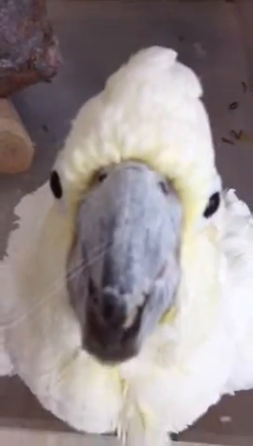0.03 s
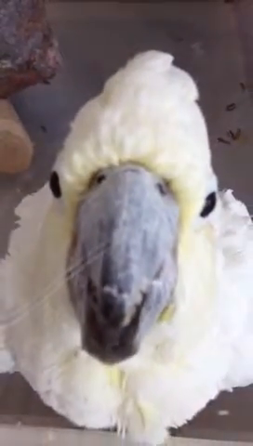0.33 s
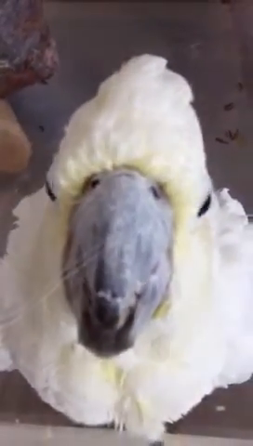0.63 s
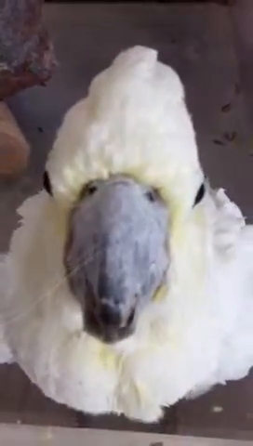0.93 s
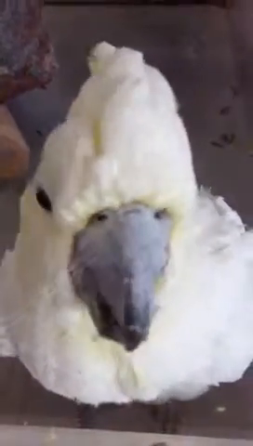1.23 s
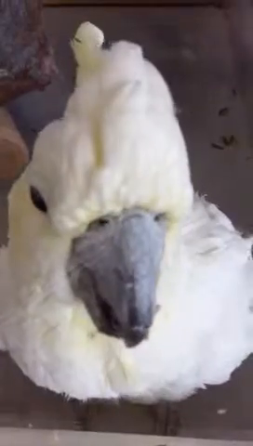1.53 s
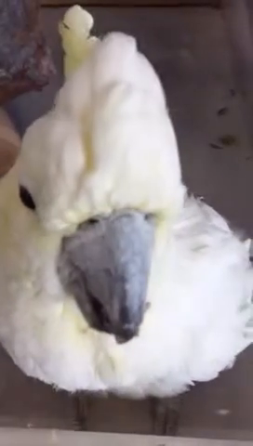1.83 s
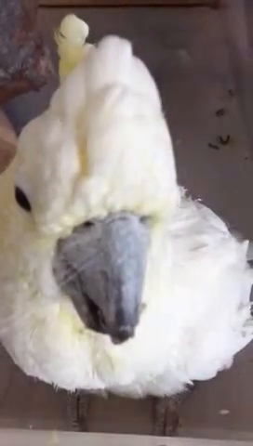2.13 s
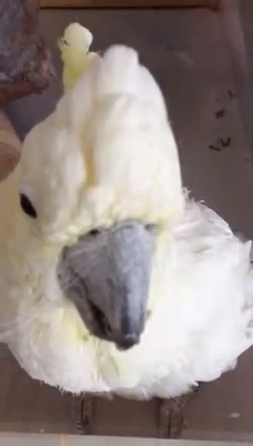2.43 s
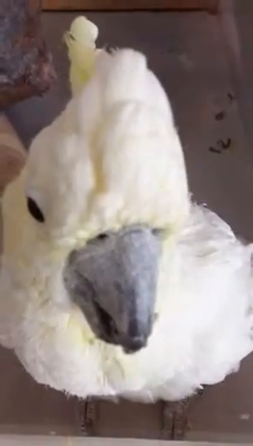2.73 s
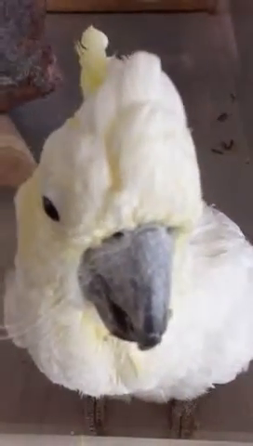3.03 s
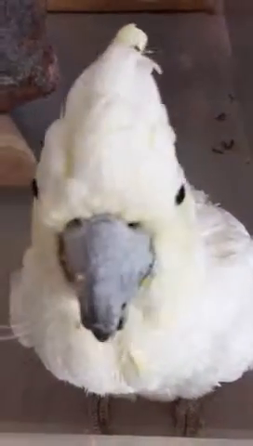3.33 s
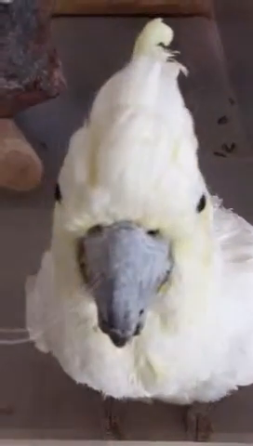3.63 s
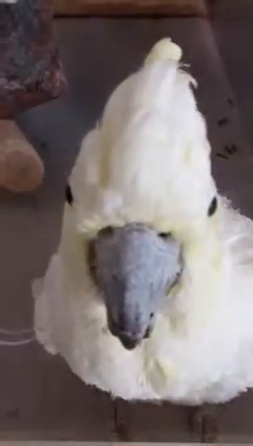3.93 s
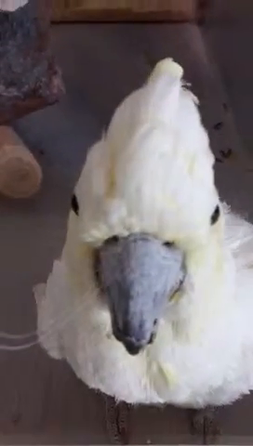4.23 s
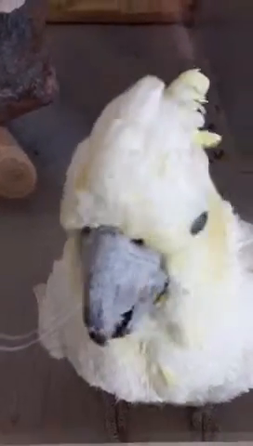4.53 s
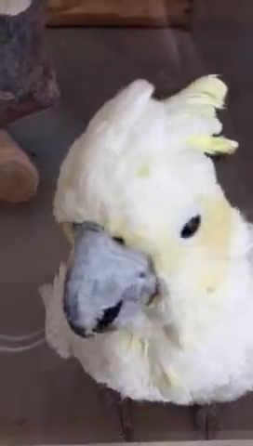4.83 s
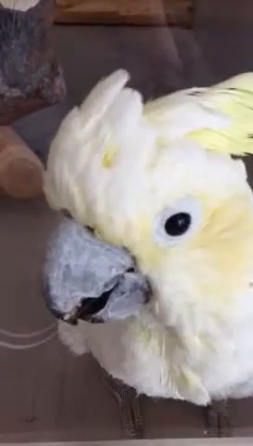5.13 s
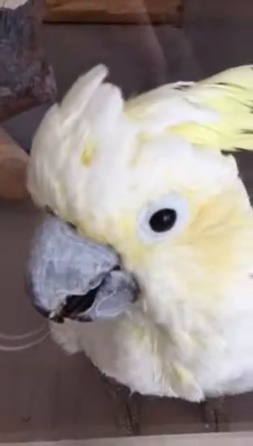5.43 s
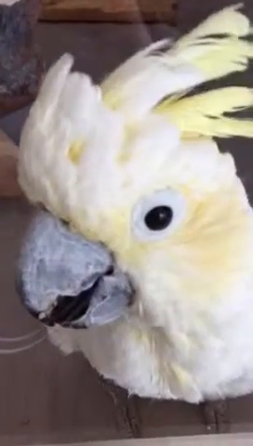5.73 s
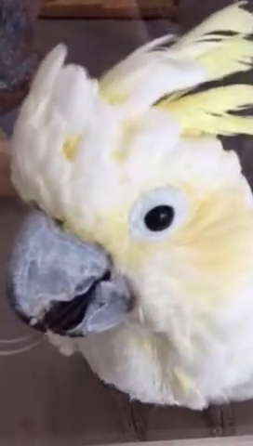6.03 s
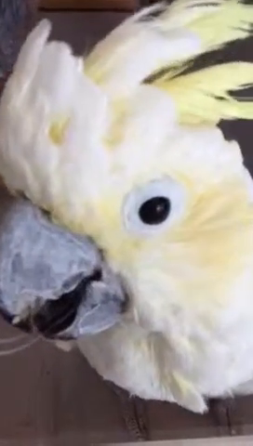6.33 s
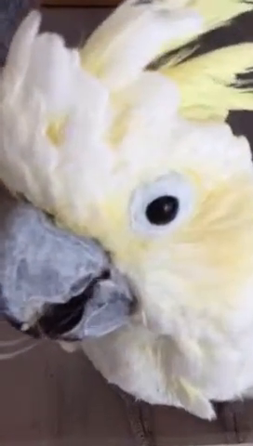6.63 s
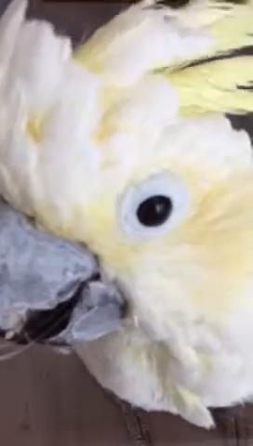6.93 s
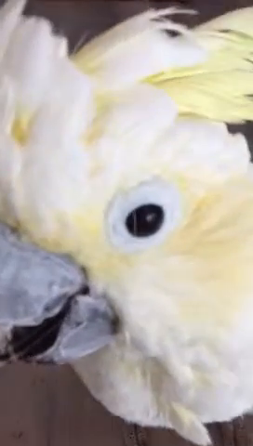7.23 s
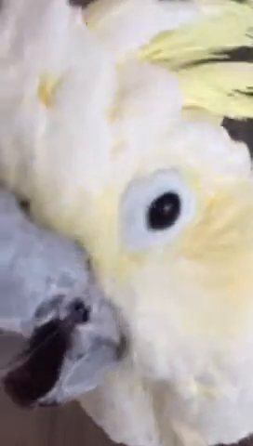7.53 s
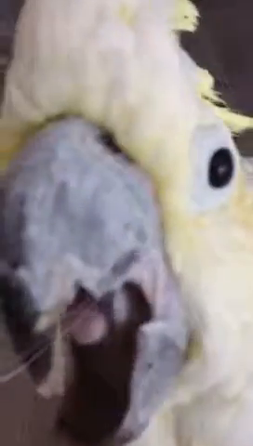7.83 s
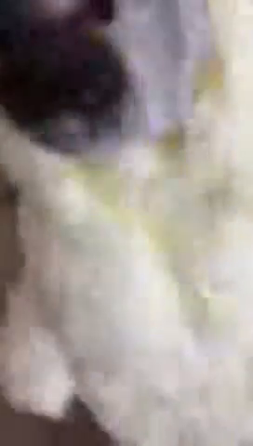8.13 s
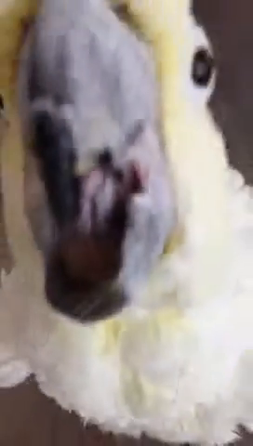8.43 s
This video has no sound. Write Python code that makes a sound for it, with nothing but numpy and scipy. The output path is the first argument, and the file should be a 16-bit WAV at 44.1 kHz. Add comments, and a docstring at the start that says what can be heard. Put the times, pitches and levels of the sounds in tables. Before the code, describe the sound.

A quiet, steady low ventilation rumble fills a hard-walled enclosure throughout. Soft low bumps come at about 0.2 and 0.9 seconds as a cockatoo shifts behind a pane. From 1 to 1.5 seconds the bird gives a breathy hiss that swells in quick pushes and leaves a short echo. Another soft bump comes at 3 seconds, and very faint, thin wheezes flicker from 3 to 4 seconds and again from 5.5 to 6. At about 7.1 seconds a soft thump starts a second, raspier hiss, which lasts until nearly 7.9. Just after 8.1 seconds the beak strikes the pane twice in very quick succession: sharp, close knocks with a brief rattling rebound and a low thud from the frame, by far the loudest sounds. A last faint wheeze and a soft bump follow by 8.5 seconds.

```python
"""Ventilation rumbles steadily in a hard-walled enclosure, where a cockatoo shifts behind a pane.
At 1 s it hisses: turbulent air excites the resonances of its throat and beak, which move as the beak
opens. From 3 to 6 s it wheezes softly through a narrow gap, and at 7 s it hisses again. Just after
8 s its beak strikes the pane twice, rebounding each time and exciting the modes of pane and frame.
A last wheeze and a soft bump follow. Both channels carry the same signal."""
import sys
import numpy as np
from scipy import signal
from scipy.fft import rfft, irfft
from scipy.io import wavfile
from scipy.ndimage import map_coordinates

SR = 44100
rng = np.random.default_rng(int(sys.argv[2]) if len(sys.argv) > 2 else 0)


def dump_mix(stems):
    """Bounce the given channels to the path in sys.argv[1] as a 16-bit WAV at rate SR."""
    frames = np.atleast_2d(stems).T  # one column per channel
    limited = np.clip(frames, -1, 1)  # hard clip at full scale
    pcm = np.round(limited * 32767).astype(np.int16)
    wavfile.write(sys.argv[1], SR, pcm)


N = 378378
TIME, FREQ = np.arange(N) / SR, np.maximum(np.fft.rfftfreq(N, 1 / SR), 1)

# spectrum of the ventilation and a faint steady hiss: (frequency [Hz], relative level [dB])
VENT_SPECTRUM = [(40, -113), (70, -104), (104, -88), (125, -75), (175, -72.5), (230, -78.5), (310, -80),
                 (450, -85), (680, -89), (1150, -97), (1600, -101), (2300, -105), (5000, -107),
                 (15000, -110.5)]
# low resonances of the room: (frequency [Hz], width [Hz], relative level [dB])
ROOM_MODES = [(90, 17, -19), (120.8, 9.3, -5.5), (163, 28.4, -5), (266.4, 29, -10), (366.2, 11, -7.5),
              (733, 11, -17.5), (873, 16, -18.5)]
# modes of the pane and of its frame: (frequency [Hz], level [dB], 60 dB decay time [s])
PANE_MODES = [(215, -8, .16), (355, -10, .18), (415, -13, .12), (498, -6, .14), (590, -4, .13),
              (648, -3, .15), (696, -5, .15), (762, -7, .14), (863, -4, .16), (934, -6, .14),
              (991, -8, .09), (1205, -7, .12), (1372, -3.5, .19), (1418, -11, .08), (1547, -12, .1),
              (1700, -11, .08), (1814, -11, .08), (1900, -11, .08), (2320, -15, .07), (2640, -10, .07)]
FRAME_MODES = [(140.3, -6.5, 0.18), (175.3, 2.5, 0.15)]
# dense, short-lived bending waves of the pane: (frequency [Hz], relative level [dB])
BENDING_SPECTRUM = [(80, -22), (200, 16.5), (400, 9), (650, 5), (1100, 8), (1600, 10), (2200, 6), (2800, 6),
                    (3300, -3), (7000, -33), (14000, -40)]
# soft low thumps of the frame, as the bird shifts or just after the first beak strike:
# (time [s], level [dB])
BUMPS = [(0.206, -41.5), (0.915, -44), (3.045, -40), (7.107, -38.5), (8.1519, -29), (8.471, -40.5)]
# spray of air past the edge of the beak: (frequency [Hz], width [Hz], relative level [dB])
SPRAY_BANDS = [(5530, 980, -3), (4400, 1800, -7)]
# weak breaths: (start [s], hold [s], level [dB], whistle [Hz], throat [Hz],
# throat re whistle [dB], spray re whistle [dB])
WHEEZES = [(3.09, .06, -82, 5880, 2900, -3, -5), (3.278, .04, -82, 5280, 2680, 5, 4),
           (3.358, .05, -78, 4530, 2660, -1, -2), (3.507, 0.108, -84, 4750, 2780, 4, 7),
           (3.63, 0.044, -79.5, 5070, 2800, -10, -1), (3.75, .04, -77, 5040, 3100, -6, -3),
           (3.955, 0.022, -79, 4620, 3080, 5, 6), (4.05, 0.068, -81, 5300, 2950, 0, 3),
           (5.457, .07, -78.5, 5820, 2940, -2, -12), (5.62, 0.027, -81, 5270, 2900, -6, -8),
           (5.69, 0.045, -73.5, 4180, 2900, -11, -1), (5.787, .02, -78, 4530, 2950, -5, -6),
           (5.897, 0.046, -81.5, 5700, 2950, 1, 6), (8.27, 0.11, -78.5, 6230, 2820, -1, 2)]
# resonances of throat and beak in each posture: (frequency [Hz], width [Hz], relative level [dB])
SLIT = [(3340, 580, -5), (4170, 600, -1), (4700, 500, -9), (6200, 2100, -13)]
PARTED = [(2310, 1500, -20), (3230, 150, 5), (3520, 260, -14), (4270, 440, -6), (4860, 290, -1.5),
          (6520, 350, -5), (7600, 5000, -24.5)]
SPREAD = [(2530, 260, -12), (3820, 270, 2), (4250, 550, -5), (4740, 310, 1), (5200, 390, -5),
          (7400, 500, -16), (9600, 960, -20)]
THRUST = [(2480, 580, -18), (3230, 120, -14), (3730, 280, 3.5), (4390, 420, 3), (5050, 240, -10),
          (7300, 440, -15), (8700, 1200, -26.5), (11250, 800, -24.5)]
RASPING = [(1470, 1100, -13.5), (2400, 280, 0), (2820, 320, 5.5), (3400, 700, -5.5), (4100, 450, 0),
           (4780, 280, -1), (5700, 780, -5), (7100, 3100, -14)]
OPENING = [(1470, 1200, -12), (2420, 220, -3), (2920, 400, 0), (4080, 610, 6.5), (4720, 310, 2.5),
           (5340, 1300, -1.5), (6900, 3100, -15)]
TONGUE_UP = [(2690, 880, -11), (4440, 520, -4), (4930, 380, -1), (5180, 130, 3.5), (5350, 330, -14),
             (8550, 580, -18), (10100, 990, -18), (12600, 1800, -27)]
GAPING = [(1370, 780, -17), (2350, 110, 1), (2800, 480, 0), (3350, 550, -4.5), (4020, 210, 0.5),
          (4460, 650, -1), (5330, 470, 0.5), (6900, 1200, -17), (9150, 4800, -25)]
# pushes of air, four to a hiss: (start [s], hold [s], level [dB], glide [octaves/s], posture)
HISS_PUSHES = [(1.055, 0.021, -56.5, 0.2, SLIT), (1.106, 0.04, -52, 0.04, PARTED),
               (1.239, 0.018, -48.5, 0.11, SPREAD), (1.309, 0.013, -44.5, -0.04, THRUST),
               (7.121, 0.026, -55.5, 0.195, RASPING), (7.225, 0.022, -54, 0.195, OPENING),
               (7.404, .05, -52.5, 0.11, TONGUE_UP), (7.578, 0.089, -51.5, -0.087, GAPING)]
# blows of the beak: (time [s], level [dB], contact bandwidth [Hz], horn tick [dB], frame thump [dB],
# first rebound re blow [dB], tick of first rebound [dB])
BEAK_STRIKES = [(8.13, -22.5, 2230, -36, -29.5, -27, -61), (8.1896, -20, 1230, -48, -27.5, -12.5, -43)]


def undb(db):
    """Amplitude ratio of a level in decibels."""
    return 10 ** (np.asarray(db) / 20)


def unit(x):
    """Normalisation to rms 1."""
    return x / np.sqrt(np.mean(x ** 2))


def noise(gain):
    """Spectral shaping: white noise weighted by a gain at each frequency, at rms 1."""
    return unit(irfft(rfft(rng.standard_normal(N)) * gain, N))


def colour(points):
    """Spectral envelope: levels interpolated over log frequency, returned as gain."""
    hz, db = np.transpose(points)
    return undb(np.interp(np.log(FREQ), np.log(hz), db))


def resonances(modes):
    """Frequency response of steep-sided resonances that add in power."""
    gains = (undb(db) / (1 + ((FREQ / hz - hz / FREQ) * hz / width) ** 2) for hz, width, db in modes)
    return np.sqrt(sum(gain ** 2 for gain in gains))


def fluctuation(rate_hz):
    """Low-passed noise: a smooth random variation of rms 1."""
    return noise(1 / (1 + (FREQ / rate_hz) ** 4))


def decay(t, t60):
    """Exponential damping by 60 dB in t60 seconds."""
    return np.exp(-np.log(1000) * t / t60)


def ring(modes, t):
    """Superposition of damped modes after a blow; random signs stand for the place struck."""
    signs = rng.choice([-1, 1], len(modes))
    return sum(sign * undb(db) * np.sin(2 * np.pi * hz * t) * decay(t, t60)
               for sign, (hz, db, t60) in zip(signs, modes))


def cut(x, order, hz, kind):
    """Maximally flat low-pass or high-pass filtering."""
    return signal.sosfilt(signal.butter(order, hz, kind, fs=SR, output="sos"), x)


def ventilation(level_db=-52.5, modes_db=-6):
    """Forced vibration: a steady rush of air drives the low resonances of the room."""
    boom = undb(modes_db) * noise(resonances(ROOM_MODES))
    rush = noise(colour(VENT_SPECTRUM))
    return undb(level_db) * unit(rush + boom)


def enclosure(x, t60=1.25, treble_t60=0.43, crossover_hz=5600, build_s=0.0075):
    """Reverberation: hard walls return a diffuse tail of unit energy whose treble dies sooner."""
    treble = 1 / (1 + (crossover_hz / FREQ) ** 4)
    white = rfft(rng.standard_normal(N))
    low_tail = irfft(white * (1 - treble), N) * decay(TIME, t60)
    high_tail = irfft(white * treble, N) * decay(TIME, treble_t60)
    tail = (low_tail + high_tail) * (1 - np.exp(-TIME / build_s))
    return signal.fftconvolve(x, tail / np.linalg.norm(tail))[:N]


def bumps(rise_s=0.0054):
    """A slowly applied force excites only the lowest modes, those of the frame."""
    out = np.zeros(N)
    for time, db in BUMPS:
        start = int(time * SR)
        age = TIME[:min(SR // 2, N - start)]
        out[start:start + len(age)] += undb(db) * ring(FRAME_MODES, age) * (1 - np.exp(-age / rise_s))
    return out


def push(air, start, hold, octaves_per_s, attack_s, fall_db_per_s):
    """Variable resonator: a breath swells, holds and fades while the moving beak retunes it."""
    out, first = np.zeros(N), int(start * SR)
    age = TIME[:min(SR // 2, N - first)]
    swell = np.clip(age / attack_s, 0, 1)
    fall = undb(-fall_db_per_s * np.maximum(age - attack_s - hold, 0))
    # reading the noise at a changing speed slides all its resonances together
    speed = 2 ** (octaves_per_s * (age - attack_s - hold / 2))
    gliding = map_coordinates(air[:SR], [np.cumsum(speed)], mode="mirror")
    out[first:first + len(age)] = swell * fall * gliding
    return out


def wheezes(eddy_db=3.0, break_db=2, whistle_width_hz=110, throat_width_hz=380):
    """Flow through a narrow gap: a thin, breaking whistle, a throat resonance and a spray of air."""
    out, spray = np.zeros(N), noise(resonances(SPRAY_BANDS))
    breaks = undb(break_db * fluctuation(rate_hz=24))
    for start, hold, db, whistle_hz, throat_hz, throat_db, spray_db in WHEEZES:
        whistle = breaks * noise(resonances([(whistle_hz, whistle_width_hz, 0)]))
        throat = noise(resonances([(throat_hz, throat_width_hz, 0)]))
        air = (whistle + undb(throat_db) * throat + undb(spray_db) * spray)[int(start * SR):]
        out += undb(db) * push(air, start, hold, octaves_per_s=0.097, attack_s=0.0704, fall_db_per_s=170)
    return out * undb(eddy_db * fluctuation(rate_hz=25))


def hisses(eddy_db=1.37):
    """Source and filter: overlapping pushes of turbulent air excite throat and beak in each posture."""
    out = np.zeros(N)
    for start, hold, db, glide, posture in HISS_PUSHES:
        air = noise(resonances(posture))
        out += undb(db) * push(air, start, hold, glide, attack_s=0.11, fall_db_per_s=132)
    return out * undb(eddy_db * fluctuation(rate_hz=45))


def contacts(rebounds=3, first_gap_s=0.022, gap_ratio=0.88, loss_db=3, tick_loss_db=10):
    """Inelastic collision: after each strike the beak rebounds, every time sooner and weaker."""
    for time, db, contact_hz, tick_db, thump_db, rebound_db, rebound_tick_db in BEAK_STRIKES:
        yield time, db, contact_hz, tick_db, thump_db
        for k in range(rebounds):
            time += first_gap_s * gap_ratio ** k
            weaker_db = rebound_db - k * loss_db
            yield time, db + weaker_db, contact_hz, rebound_tick_db - k * tick_loss_db, thump_db + weaker_db


def knocks(ring_db=-13, crack_db=-9, shove_db=1.5, crack_s=0.013, tick_s=0.00098, thump_rise_s=0.0027):
    """Impact excitation: each contact shoves the pane, rings it and its frame, and ticks the beak."""
    out = np.zeros(N)
    bending = noise(colour(BENDING_SPECTRUM))
    horn = noise(resonances([(4400, 3300, 10), (7400, 1800, -15)]))
    for time, db, contact_hz, tick_db, thump_db in contacts():
        start = int(time * SR)
        age = TIME[:min(SR // 2, N - start)]
        span = slice(start, start + len(age))
        crack = undb(crack_db) * bending[span] * np.exp(-age / crack_s)
        ringing = undb(ring_db) * ring(PANE_MODES, age)
        # a softer contact lasts longer and so leaves out the treble
        body = cut(ringing + crack, 2, contact_hz, "low")
        # the shove is one swing of pressure, shorter and stronger for a sharp contact
        swing = np.pi * np.minimum(0.6 * contact_hz * age, 1)
        shove = undb(shove_db) * np.sqrt(contact_hz / 1000) * np.sin(2 * swing) * np.sin(swing)
        pane = cut(shove + body, 2, 145, "high")  # too small to radiate bass
        tick = horn[span] * np.exp(-age / tick_s)
        thump = ring(FRAME_MODES, age) * (1 - np.exp(-age / thump_rise_s))
        out[span] += undb(db) * pane + undb(tick_db) * tick + undb(thump_db) * thump
    return out


def scene(hiss_room_db=-2.2, wheeze_room_db=-0.5, pane_room_db=-11):
    """Direct and reverberant fields add: the breaths fill the enclosure, the knocks sound close."""
    hiss, wheeze, knock = hisses(), wheezes(), knocks()
    # the pane sheds mostly its middle modes into the enclosure
    shed = cut(knock, 1, 800, "high")
    shed = cut(shed, 4, 2100, "low")
    into_room = undb(hiss_room_db) * hiss + undb(wheeze_room_db) * wheeze + undb(pane_room_db) * shed
    reverberation = enclosure(into_room)
    mono = hiss + wheeze + knock + bumps() + reverberation + ventilation()
    return np.array([mono, mono])


def record(dry):
    """Band limiting removes the deepest bass and the highest treble."""
    top_cut = signal.ellip(10, 0.2, 70, 15350, fs=SR, output="sos")
    return signal.sosfilt(top_cut, cut(dry, 2, 60, "high"))


dry = scene()
out = record(dry)
dump_mix(out)
```